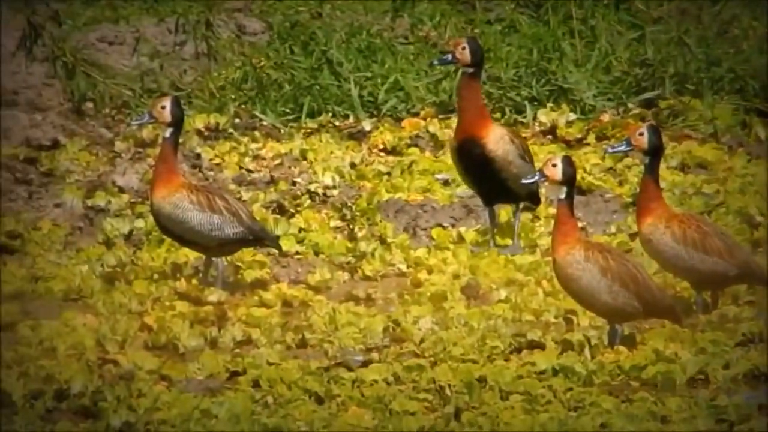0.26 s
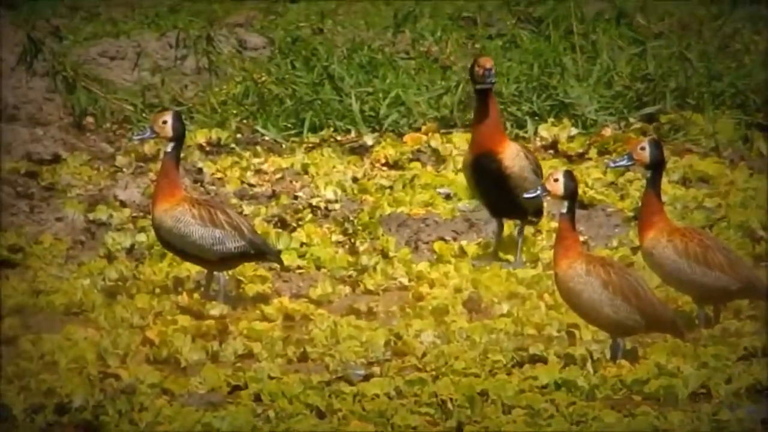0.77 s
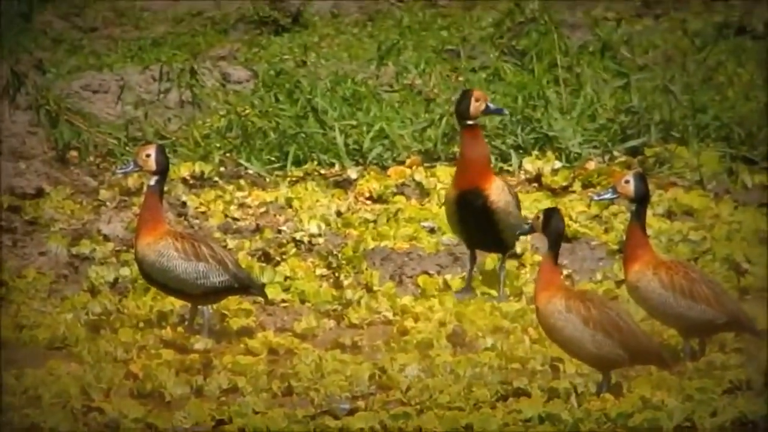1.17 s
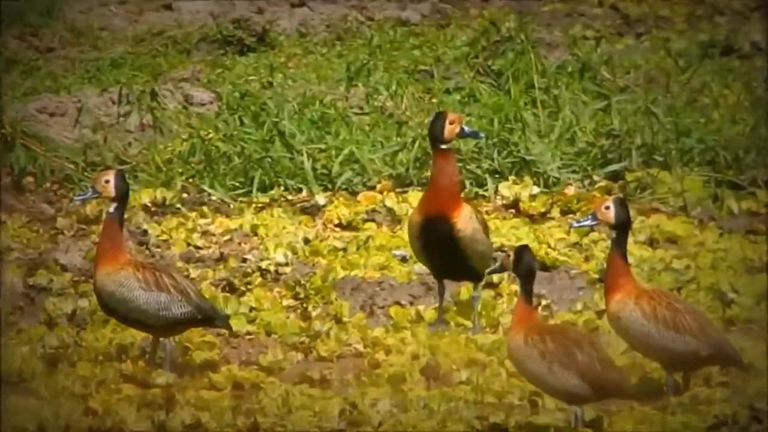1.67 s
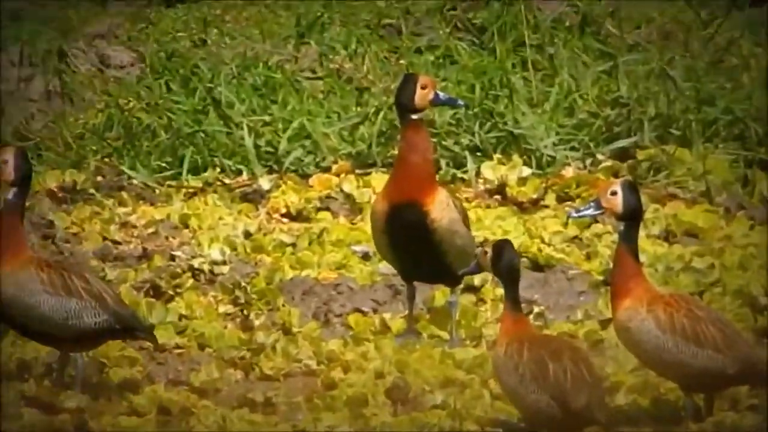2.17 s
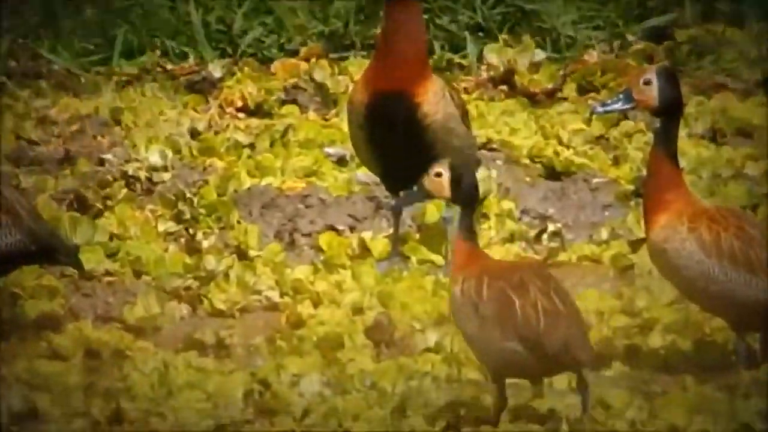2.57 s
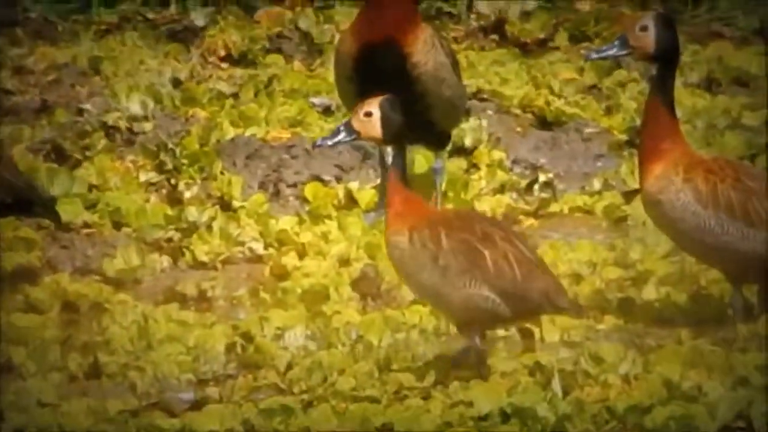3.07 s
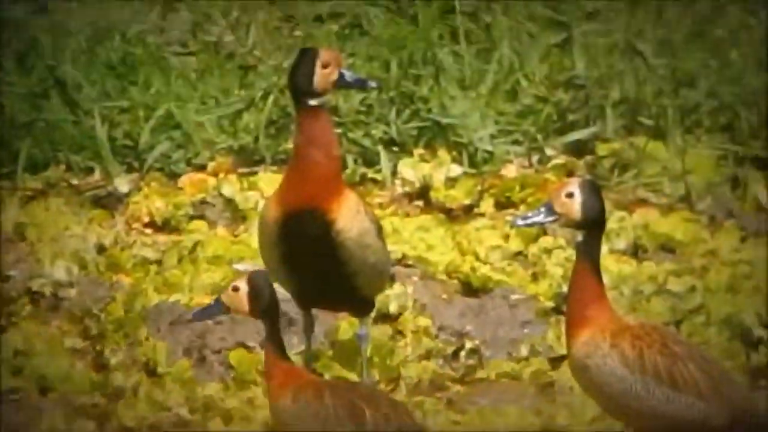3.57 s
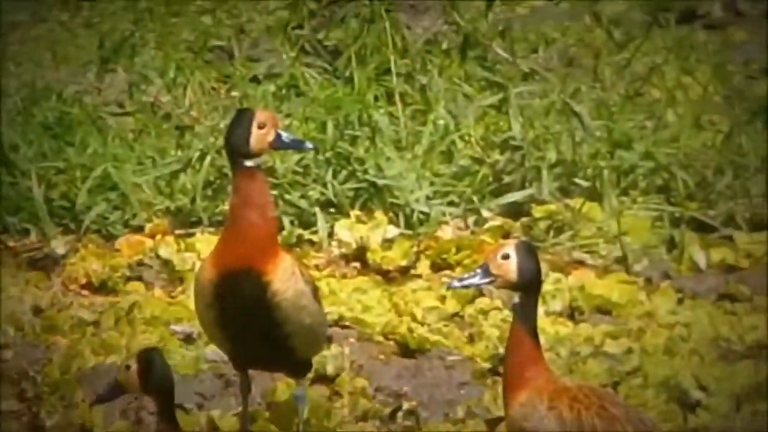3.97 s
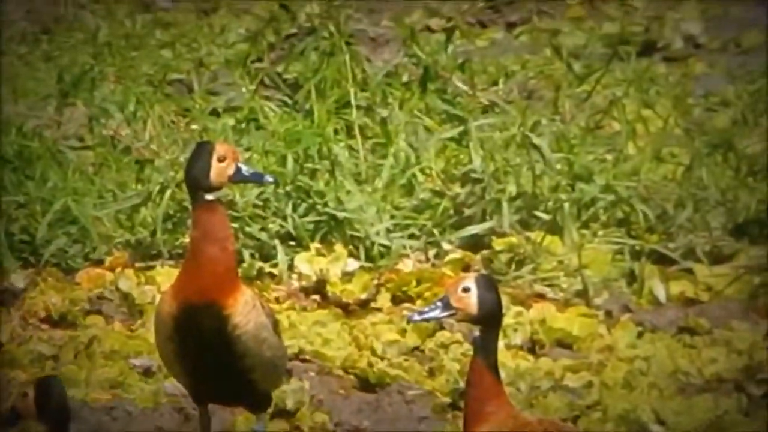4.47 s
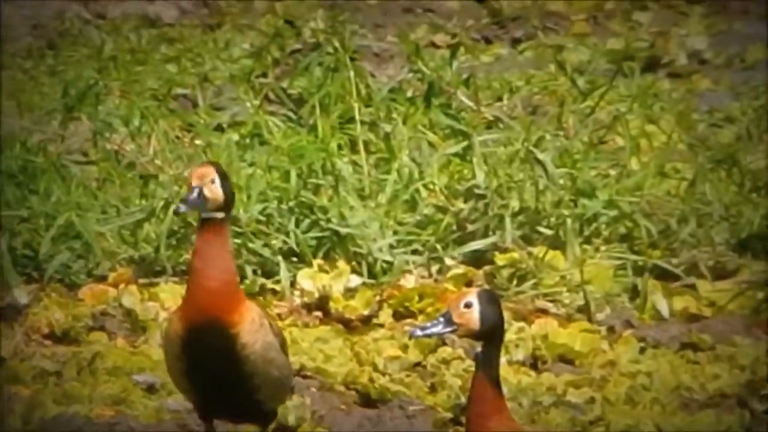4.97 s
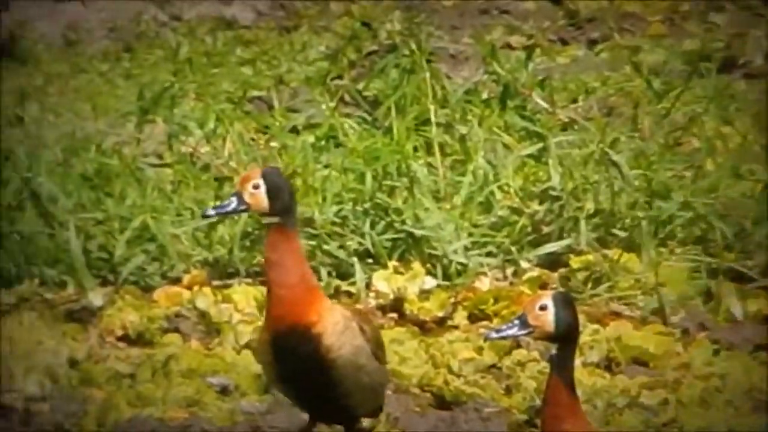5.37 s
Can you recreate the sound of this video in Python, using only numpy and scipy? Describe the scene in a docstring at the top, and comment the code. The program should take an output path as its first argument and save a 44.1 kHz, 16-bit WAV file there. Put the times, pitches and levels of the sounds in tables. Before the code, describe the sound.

Short piping duck calls with creaky clucks grow sharper and more widely spaced, against faint leaves, water and insects.

```python
"""In a wetland, a water bird close by pipes a run of short notes that slow down and brighten.
Its syrinx is a harmonic source, filtered by the resonances of windpipe, throat and opening bill.
Each note arches in pitch; creaky clucks fall among them and the banks send back a soft tail.
Behind it are far leaves and water, insects hissing in two high bands, a faint hum that comes
and goes and a few dull knocks. Wind rumbles on the microphones, mostly on the right."""
import sys
import numpy as np
from scipy import signal
from scipy.io import wavfile

SR = 44100
rng = np.random.default_rng(int(sys.argv[2]) if len(sys.argv) > 2 else 0)


def master(y):
    """Save y as 16-bit WAV."""
    cut = np.clip(np.atleast_2d(y).T, -1, 1)
    pcm = np.round(cut * 32767)  # scale
    wavfile.write(sys.argv[1], SR, pcm.astype(np.int16))


N = 248283

# Spectrum of far leaves and water: f/Hz, relative spectral level/dB
AMBIENT_SPECTRUM = [(53, -32), (90, -0.5), (156, 0), (532, -2.5), (865, -4), (2060, -11), (5110, -12),
                    (6720, -11), (8660, -16), (10000, -24.5), (12700, -15), (14100, -27)]
# Likeness of that sound at the two microphones: f/Hz, correlation/1
AMBIENT_CORRELATION = [(60, 0.88), (230, 0.36), (900, 0.4), (3510, 0.025), (13600, 0.041)]
# Insect bands: centre f/Hz, bandwidth/Hz, level on the right/dB
INSECT_BANDS = [(6650, 1100, -62), (8400, 1240, -61)]
# Course of the wind rumble: t/s, level/dB
GUSTS = [(0.0, -48), (0.09, -56.5), (1.16, -55), (1.35, -64), (1.49, -46.5), (1.63, -63.5), (1.74, -53.5),
         (1.85, -65), (2.45, -66), (2.6, -52), (2.93, -69), (3.0, -54), (3.57, -71), (4.0, -59.5),
         (4.03, -64), (5.63, -71)]
# Stretches of hum: onset t/s, duration/s, f/Hz, level/dB
HUM_SPANS = [(.05, 0.43, 155, -72.5), (.6, 0.38, 161.2, -70), (1.32, 0.76, 157.1, -66),
             (3.98, 0.49, 148.4, -65.5), (4.58, 0.27, 159.5, -60), (4.95, 0.98, 149.3, -68.5)]
# Dull knocks: onset t/s, level of the decay extrapolated to the onset/dB
KNOCK_EVENTS = [(1.818, -42), (1.956, -36.5), (2.2, -41.5), (2.82, -39), (4.632, -42), (4.712, -41.5)]
# Piping notes: onset t/s, rise to the crest/s, time after it/s, crest f/Hz, final f/Hz,
# nominal level of the fundamental at the crest/dB
PIPED_NOTES = [ (0.276, 0.029, 0.0018, 745, 760, -45.5), (.363, 0.013, 0.019, 659, 486, -44),
               (.391, 0.01, 0.019, 702, 497, -41.5), (.471, 0.0095, 0.0091, 616, 590, -49),
               (0.562, 0.0046, 0.019, 585, 560, -55), (0.703, .014, .016, 652, 540, -46.5),
               (.842, 0.034, 0.024, 688, 470, -44), (0.993, .042, 0.0097, 706, 750, -42),
               (1.152, 0.04, 0.012, 703, 715, -40.5), (1.318, 0.033, 0.00484, 726, 735, -41),
               (1.48, 0.032, 0.0043, 732, 730, -41), (1.634, 0.038, 0.0035, 718, 720, -41.5),
               (1.802, 0.035, 0.012, 694, 705, -41), (1.974, 0.029, 0.032, 684.7, 516, -40),
               (2.163, 0.032, 0.039, 669.7, 403, -40), (2.362, .036, 0.045, 672.3, 401, -40),
               (2.556, .034, .042, 680, 400, -40), (2.76, .034, 0.053, 661.3, 390, -41),
               (3.011, .034, .028, 660.3, 633, -41), (3.314, .034, 0.024, 656.3, 706, -42),
               (3.532, 0.034, 0.015, 662.5, 695, -40.5), (3.615, 0.0089, .045, 401.4, 709, -48),
               (4.165, 0.034, 0.034, 635, 430, -44.5), (4.33, 0.036, 0.037, 644, 466, -44),
               (4.56, 0.039, 0.042, 653.3, 420, -43.5)]
# Clucks: onset t/s, duration/s, initial f/Hz, nominal level of the fundamental/dB
CREAKY_CLUCKS = [ (0.308, .013, 456, -49), (0.487, .012, 478, -50.5), (.583, .017, 522, -52),
                 (0.686, .016, 438, -56), (0.733, .008, 492, -54), (1.041, .015, 440, -52.5),
                 (1.205, .011, 446, -48), (1.368, .01, 418, -53.5), (1.529, .011, 420, -49.5),
                 (1.686, .013, 420, -52.5), (1.855, .0085, 478, -48.5), (1.971, .005, 415, -50),
                 (2.031, .010, 424, -53.5), (3.082, .013, 400, -60.5), (3.393, .013, 382, -65),
                 (3.637, 0.017, 639, -46.5)]
# Vocal posture as the bill opens, with resonance levels relative to the nominal fundamental: t/s,
# exponent of the pitch rise/1, windpipe level/dB, throat f/Hz, throat level/dB, bill f/Hz, bill level/dB
POSTURES = [(.28, 1.36, 8, 2000, -25, 2700, -24), (.7, 1.44, 12, 1960, -31, 2690, -22),
            (1.318, 1.51, 4, 1860, -5.5, 2570, -15), (1.65, 1.73, 2.5, 1800, -2, 2600, -14),
            (1.8, 2.16, 1.5, 1950, 3, 2630, -14), (1.979, 2.12, 1.2, 2070, 7.5, 2580, -11),
            (2.17, 2.16, -1.5, 2350, 10, 3600, -2.5), (2.37, 2.03, -2, 2320, 6, 3460, 5.5),
            (2.77, 2.03, -4, 2200, 6.5, 3570, 6.5), (3.54, 2.57, -3.5, 2280, 5.5, 3590, 7),
            (3.62, 2.8, -4, 2054, 0, 3750, 1.5), (4.17, 2.15, 3, 2320, 7, 3900, 7.5),
            (4.57, 2.05, -1, 2270, 7, 3730, 9)]

WINDPIPE_HZ, WINDPIPE_WIDTH_HZ, THROAT_WIDTH_HZ, BILL_WIDTH_HZ = 1164, 563, 603, 966
RASP_HZ, RASP_WIDTH_HZ, RASP_DB = 6260, 3550, -11.5   # a broad hoarse top; level relative to the bill
SCOOP_DROP, SCOOP_S = .27, .032   # the pitch is lower by this share, this long before the crest
SLACK_DB, SLACK_FUNDAMENTAL_DB, SLACK_ROUGHNESS = -7, -22, 1.5   # per octave below the crest
FADE_DB_PER_S, CLOSING_DB = 54, -9   # closing: loss of throat and bill resonance by the end of a note


def from_db(db):
    """Amplitude ratio of a level in decibels."""
    return 10 ** (np.asarray(db) / 20)


def unit_rms(x):
    """Normalisation to unit mean-square value."""
    return x / np.sqrt(np.mean(x ** 2) + 1e-20)


def at_hz(table, hz):
    """Linear interpolation on a logarithmic frequency axis."""
    table_hz, values = np.transpose(table)
    return np.interp(np.log(hz), np.log(table_hz), values)


def band(x, low_hz, high_hz):
    """Butterworth band-pass filtering."""
    return signal.sosfilt(signal.butter(2, [low_hz, high_hz], "band", fs=SR, output="sos"), x)


def drift(corner_hz):
    """Slow random fluctuation: low-passed noise of unit power, computed at SR / 40."""
    pole = np.exp(-2 * np.pi * corner_hz * 40 / SR)
    slow = signal.lfilter([1], [1, -2 * pole, pole * pole], rng.standard_normal(N // 40 + 2002))[2000:]
    return np.interp(np.arange(N) / 40, np.arange(len(slow)), unit_rms(slow))


def add(out, start_s, x):
    """Superposition of x on out from a given onset."""
    at = round(start_s * SR)
    out[at:at + len(x)] += x[:N - at]


def swell(length_s, attack_s, release_s):
    """Time axis and amplitude envelope with raised-cosine edges."""
    t = np.arange(round(length_s * SR)) / SR
    edge = np.clip(np.minimum(t / attack_s, (length_s - t) / release_s), 0, 1)
    return t, np.sin(np.pi / 2 * edge) ** 2


def leaves_and_water(level_db=-55, wander_db=.5):
    """Partial coherence: far sources give half-octave noise bands, most alike left and right when low."""
    out, edges_hz = 0, 80 * 2 ** np.arange(0, 7.9, .5)
    white = rng.standard_normal((2, 2, N))
    for k, (low, high) in enumerate(zip(edges_hz, edges_hz[1:])):
        mid, side = band(white[k % 2], low, high)
        hz = np.sqrt(low * high)
        alike = np.clip(at_hz(AMBIENT_CORRELATION, hz), 0, 1)
        gain = from_db(at_hz(AMBIENT_SPECTRUM, hz) + wander_db * drift(2.4))
        out = out + gain * (np.sqrt(1 + alike) * mid + np.sqrt(1 - alike) * side * [[1], [-1]])
    return from_db(level_db) * unit_rms(out)


def insects(throb_db=.8, left_db=-4.5):
    """Incoherent summation: a far chorus merges into two noise bands that throb a little."""
    chorus = 0
    for hz, width, db in INSECT_BANDS:
        gain = from_db(db + throb_db * drift(18.6))
        hiss = band(rng.standard_normal((2, N)), hz - width / 2, hz + width / 2)
        chorus = chorus + gain * unit_rms(hiss)
    return chorus * from_db([[left_db], [0]])


def hum():
    """Frequency modulation: a faint low tone wavers by about one percent as it comes and goes."""
    out, waver = np.zeros(N), 1 + 0.011 * drift(2.0)
    for start, length, hz, db in HUM_SPANS:
        t, envelope = swell(length, attack_s=0.052, release_s=0.092)
        cycles = np.cumsum(hz * waver[:len(t)]) / SR
        add(out, start, np.sqrt(2) * from_db(db) * envelope * np.sin(2 * np.pi * cycles))
    return out


def knocks(hz=205, attack_s=0.0084, t60_s=0.086):
    """Damped oscillation: each dull knock is one low sinusoid with a soft onset."""
    out, t = np.zeros(N), np.arange(SR // 4) / SR
    envelope = (1 - np.exp(-t / attack_s)) * from_db(-60 * t / t60_s)
    for start, db in KNOCK_EVENTS:
        add(out, start, from_db(db) * envelope * np.sin(2 * np.pi * hz * t))
    return out


def wind(buffet_db=2.5, left_db=-8):
    """Turbulent pressure: each microphone has its own rumble, and both follow the same gusts."""
    gust_db = np.interp(np.arange(N) / SR, *np.transpose(GUSTS)) + buffet_db * drift(4.0)
    rumble = band(rng.standard_normal((2, N)), 21, 52.4) * from_db([[left_db], [0]])
    return from_db(gust_db) * rumble / np.std(rumble.mean(axis=0))


def reflections(x, plants_t60_s=.1, banks_t60_s=0.94, each_db=-8):
    """Reverberation: near plants scatter briefly, the banks give a long tail; the two sides differ."""
    t = np.arange(SR) / SR
    plants = from_db(-60 * t / plants_t60_s)
    banks = (1 - np.exp(-t / 0.0023)) * from_db(-60 * t / banks_t60_s)
    response = sum(from_db(each_db) * rng.standard_normal((2, SR)) * decay / np.linalg.norm(decay)
                   for decay in (plants, banks))
    reflected_band = signal.butter(1, [1176, 4590], "band", fs=SR, output="sos")
    return signal.fftconvolve(signal.sosfilt(reflected_band, x)[None], response, axes=1)[:, :N]


def direct_path(x, lag_s=8e-5, shadow_hz=6100, balance_db=1.7):
    """Path difference and shadowing: sound from the right reaches the left later, weaker and duller."""
    pole = np.exp(-2 * np.pi * shadow_hz / SR)
    delay = lag_s * SR - pole / (1 - pole)   # in samples; the low-pass supplies the rest of the lag
    late = np.interp(np.arange(N) - delay, np.arange(N), x)
    shadowed = signal.lfilter([1 - pole], [1, -pole], late)
    return np.array([from_db(-balance_db / 2) * shadowed, from_db(balance_db / 2) * x])


def posture_at(time_s):
    """Articulation: the pitch-rise exponent and the resonances move linearly between postures."""
    times, *columns = np.transpose(POSTURES)
    return [np.interp(time_s, times, column) for column in columns]


def locking_db(pitch_hz, lock_hz=580, width_hz=16, step_db=11):
    """Locking of the membranes: the level takes a soft step up as the pitch passes a threshold."""
    return step_db / (1 + np.exp((lock_hz - pitch_hz) / width_hz))


def voice(pitch_hz, tract, roughness, fundamental_db=0, closing_db=0):
    """Source and filter: resonances weight the harmonics of the syrinx; unsteady air modulates them."""
    windpipe_db, throat_hz, throat_db, bill_hz, bill_db = tract
    order = np.arange(1, 19)[:, None]
    hz = order * pitch_hz
    power = from_db(-31 * np.log2(order)) ** 2   # the source falls 31 dB per octave
    power /= np.ones_like(order)
    power = power / (1 + (430 / hz) ** 6)   # tones below 430 Hz radiate poorly
    power[0] *= from_db(fundamental_db) ** 2
    for centre_hz, width_hz, db in [(WINDPIPE_HZ, WINDPIPE_WIDTH_HZ, windpipe_db),
                                    (throat_hz, THROAT_WIDTH_HZ, throat_db + closing_db),
                                    (bill_hz, BILL_WIDTH_HZ, bill_db + closing_db),
                                    (RASP_HZ, RASP_WIDTH_HZ, bill_db + closing_db + RASP_DB)]:
        resonance = from_db(db) / (1 + (2 * (hz - centre_hz) / width_hz) ** 2)
        power += (order > 1) * resonance ** 2
    depth = roughness + .22 * np.maximum(order - 6, 0)   # harmonics above the sixth grow rougher
    unsteady_air = unit_rms(band(rng.standard_normal(hz.shape), 61, 246))
    flutter = (1 + depth * unsteady_air) / np.sqrt(1 + depth ** 2)
    phase = 2 * np.pi * np.cumsum(hz, axis=1) / SR + rng.uniform(0, 2 * np.pi, order.shape)
    return np.sqrt(2) * np.sum(np.sqrt(power) * flutter * np.sin(phase), axis=0)


def clucks(sag=0.12):
    """Deep random amplitude modulation makes these brief, sagging tones creak."""
    out = np.zeros(N)
    for start, length, first_hz, db in CREAKY_CLUCKS:
        t, envelope = swell(length, attack_s=.3 * length, release_s=.3 * length)
        pitch_hz = first_hz * (1 - sag * t / length)
        add(out, start, from_db(db) * envelope * voice(pitch_hz, posture_at(start)[1:], roughness=.7))
    return out


def piping():
    """Membrane tension sets the pitch: below a note's crest the slack voice is weaker and rougher."""
    out = np.zeros(N)
    for start, rise_s, after_s, crest_hz, last_hz, db in PIPED_NOTES:
        t, envelope = swell(rise_s + after_s, attack_s=0.0084, release_s=0.0083)
        from_crest_s = t - rise_s
        exponent, *tract = posture_at(start)
        # the pitch scoops up to the crest, then bends down or on upward to its final value
        scoop_hz = crest_hz * (1 - np.minimum(SCOOP_DROP * np.abs(from_crest_s / SCOOP_S) ** exponent, .6))
        bend_hz = crest_hz + (last_hz - crest_hz) * np.abs(from_crest_s / after_s) ** 2.3
        pitch_hz = np.where(from_crest_s < 0, scoop_hz, bend_hz)
        slack = np.clip(np.log2(crest_hz / pitch_hz), 0, 1)
        unlocked_db = np.minimum(locking_db(pitch_hz) - locking_db(crest_hz), 0)
        gain = from_db(db - FADE_DB_PER_S * from_crest_s + SLACK_DB * slack + unlocked_db)
        tone = voice(pitch_hz, tract, roughness=.14 + SLACK_ROUGHNESS * slack,
                     fundamental_db=SLACK_FUNDAMENTAL_DB * slack,
                     closing_db=CLOSING_DB * np.clip(from_crest_s / after_s, 0, 1))
        add(out, start, gain * envelope * tone)
    return out


def scene():
    """Superposition of the bird's direct sound, its reflections and the wetland around."""
    bird = piping() + clucks()
    wetland = leaves_and_water() + insects()
    return direct_path(bird) + reflections(bird) + wetland + wind() + hum() + knocks()


def record(dry):
    """Band limiting: a steep elliptic low-pass removes the treble above 14150 Hz."""
    return signal.sosfilt(signal.ellip(14, .5, 85, 14150, fs=SR, output="sos"), dry)


dry = scene()
out = record(dry)
master(out)
```